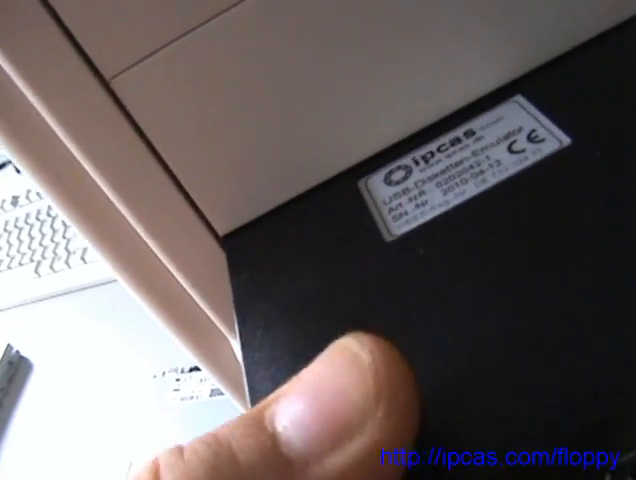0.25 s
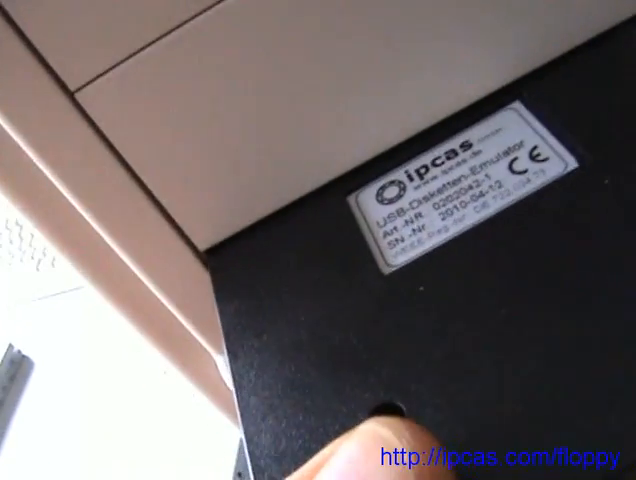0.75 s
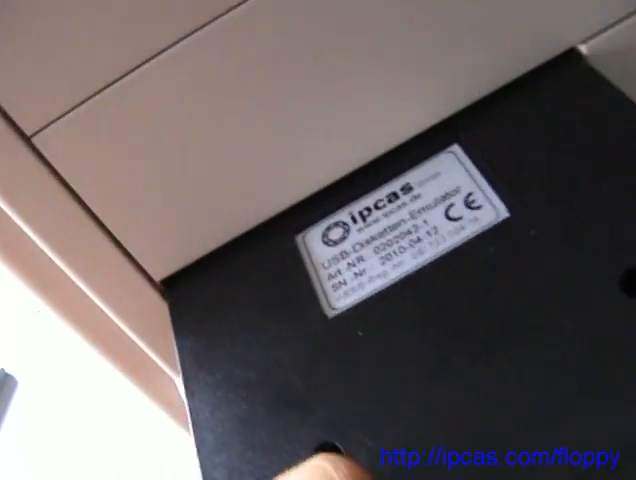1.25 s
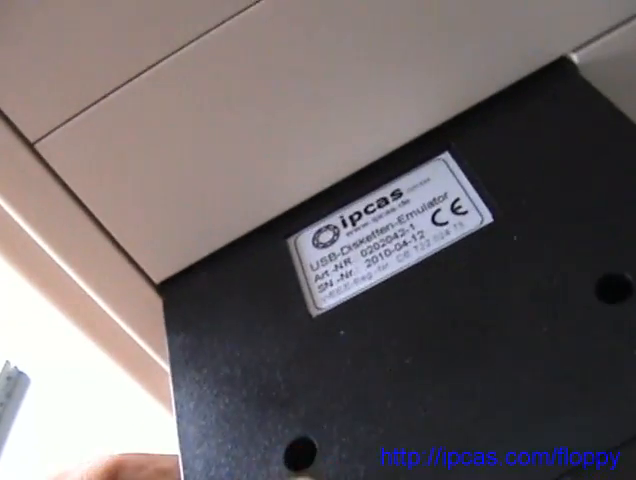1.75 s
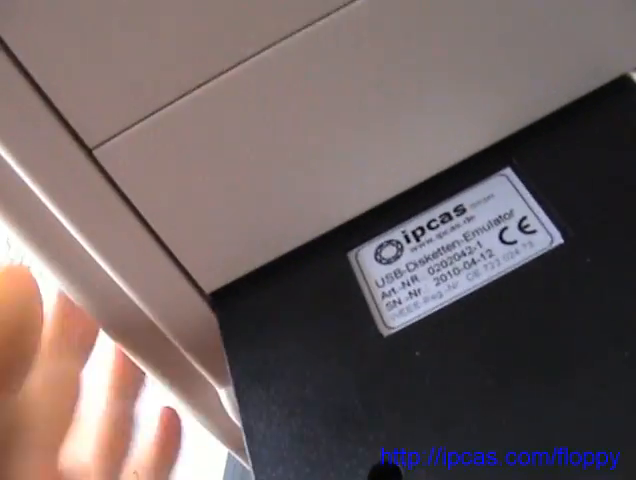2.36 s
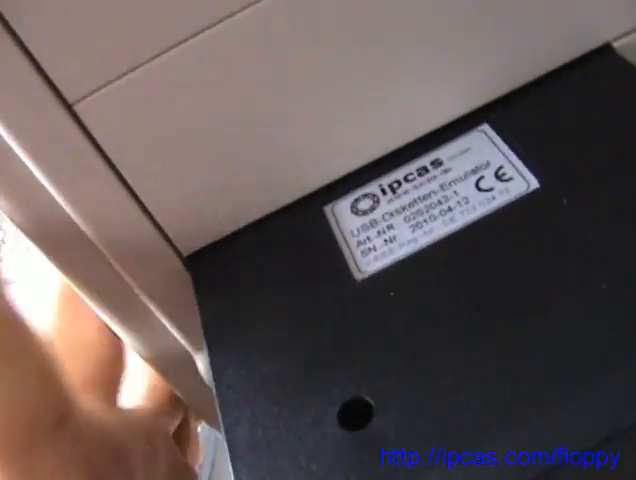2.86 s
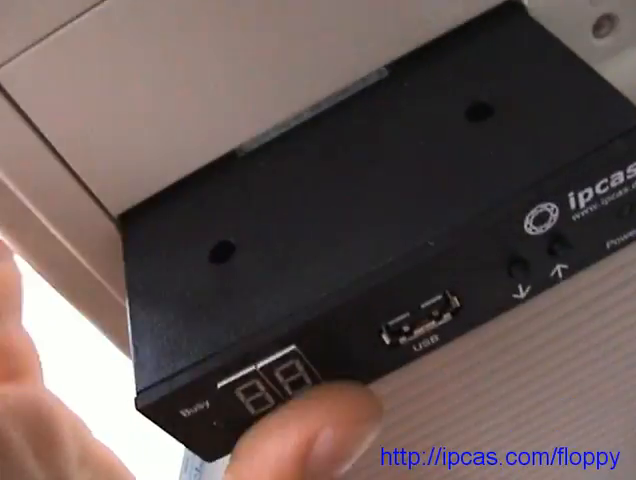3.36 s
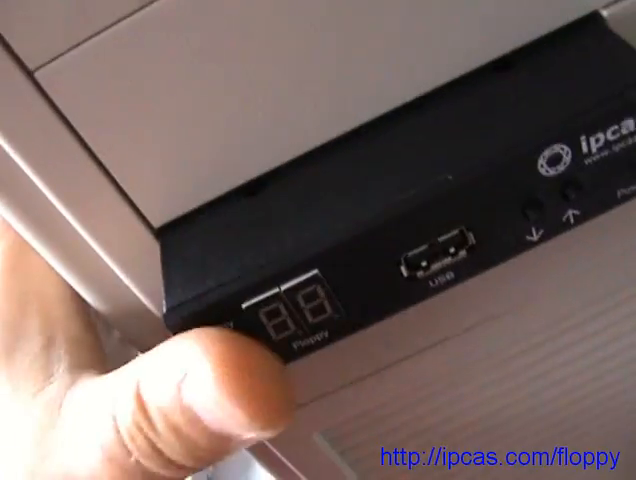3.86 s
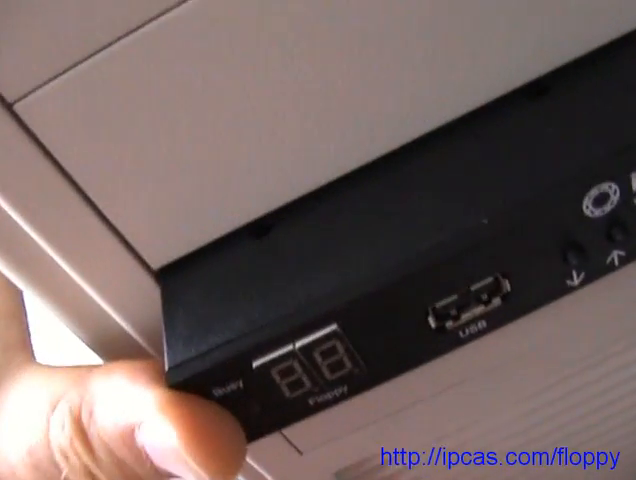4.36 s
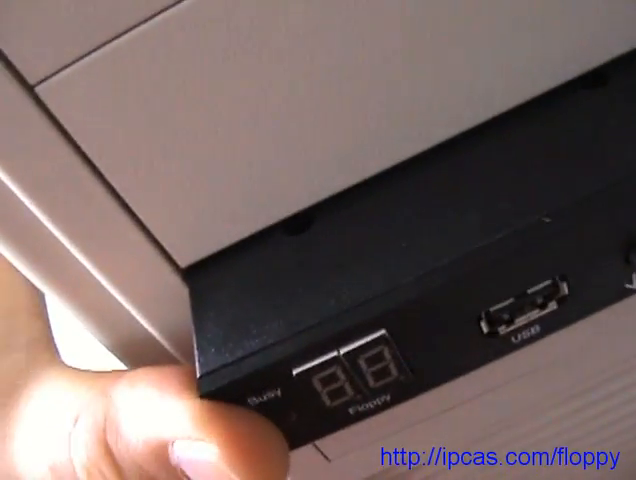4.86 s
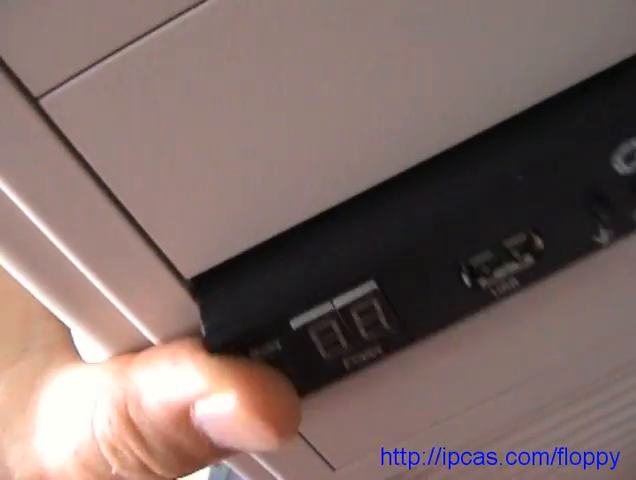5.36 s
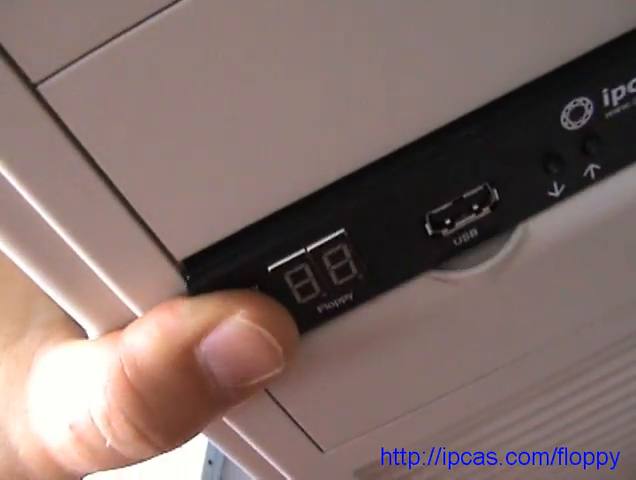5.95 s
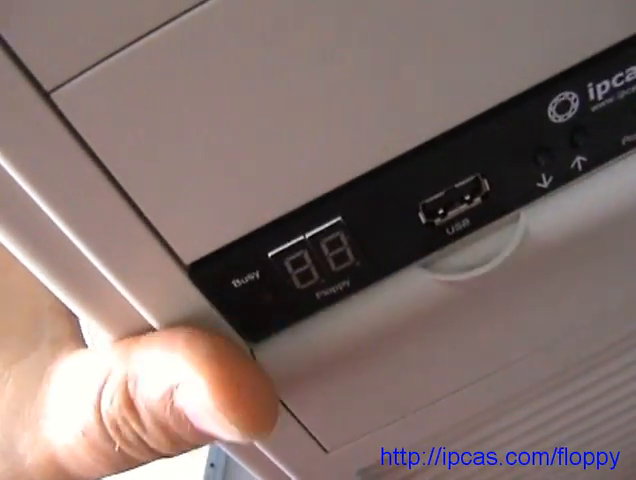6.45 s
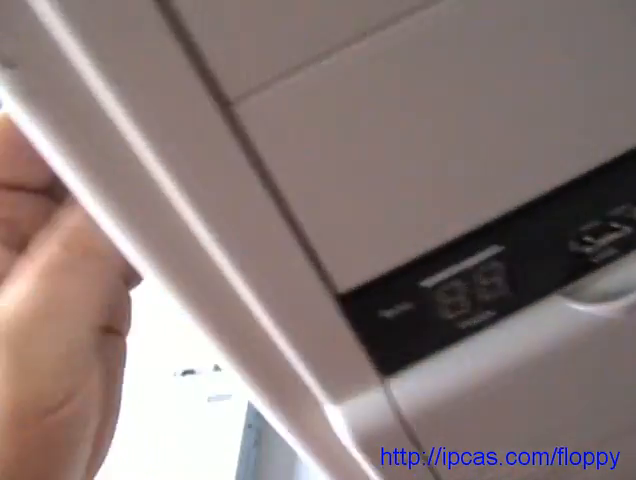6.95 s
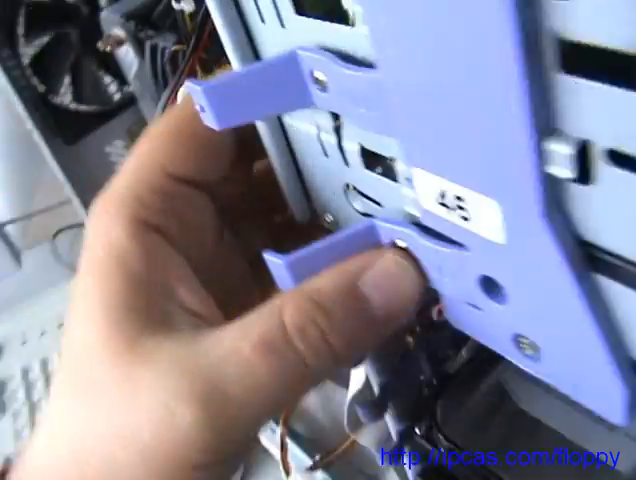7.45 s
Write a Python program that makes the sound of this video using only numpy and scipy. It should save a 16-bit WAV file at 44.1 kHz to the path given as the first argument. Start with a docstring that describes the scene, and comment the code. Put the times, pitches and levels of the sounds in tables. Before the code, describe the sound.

Close plastic knocks, clicks and short scrapes as a small drive is pushed into a metal computer case in a quiet room.

```python
"""In a small, quiet room, a small drive is nudged and pushed into the bay of a computer case,
close to a camera microphone. Its plastic shell knocks, snaps and scrapes as noise bursts and damped modes;
single sine modes squeak and ring on. Resonant bands make the sheet-metal case ring along, and
decaying noise tails form the room. Dull room noise, hiss and a faint whine lie underneath."""
import sys
import numpy as np
from scipy import signal
from scipy.fft import rfft, irfft, next_fast_len
from scipy.io import wavfile
from scipy.ndimage import map_coordinates

SR = 44100
rng = np.random.default_rng(int(sys.argv[2]) if len(sys.argv) > 2 else 0)


def dump(signal):
    """Clip the signal to [-1, 1] and save it as 16-bit WAV at the path in sys.argv[1]."""
    limited = np.clip(np.atleast_2d(signal).T, -1, 1)
    pcm = np.round(limited * 32767).astype(np.int16)
    wavfile.write(sys.argv[1], SR, pcm)


N = 339122  # samples

# In contact tables, levels are before the register trims and decays before the register factors.
# the drive knocks against the rails: (time [s], body level [dB], thud re body [dB], hardness [dB],
# thud pitch [Hz], decay t60 [s])
KNOCKS = [(0.041, -34, -3.5, -18, 335, 0.027), (0.201, -54, -2, 2.5, 338, 0.051),
          (0.244, -29.5, -2, -19, 314, 0.076), (0.484, -42.5, 5.5, -19, 349, 0.042),
          (0.563, -40, -5, -13.5, 212, 0.078), (0.637, -47, 1, -4, 238, 0.14),
          (0.673, -34, -5.5, -16.5, 201, 0.06), (0.786, -35.5, 0, 2, 286, .12),
          (0.919, -42, -2.5, -20, 225, 0.039), (1.101, -27.5, -6, -10, 363, 0.055),
          (1.244, -42.5, 5, -10.5, 302, .063), (1.319, -38, 6, -8.5, 380, .065),
          (1.402, -47.5, 2.5, -1.5, 194, 0.24), (1.44, -50, 2, 0, 188, 0.09),
          (1.676, -23.5, -4.5, -3, 232, 0.057), (1.783, -35.5, 2.5, -6.5, 419, 0.036),
          (1.796, -33.5, -10, -12.5, 470, 0.081), (2.1801, -19.5, -5, -6, 444, 0.06),
          (2.582, -50.5, -10, -4.5, 380, .08), (2.7273, -27.5, 2, -0.5, 256, 0.096),
          (2.922, -48, -12, -13.5, 233, 0.083), (3.091, -47, 5, -12, 238, 0.063),
          (3.152, -52, 16.5, -2.5, 266, 0.16), (3.197, -19.5, -9.5, -14, 370, 0.083),
          (3.243, -22.5, -17, -4, 238, 0.13), (3.27, -28.5, -0.5, -6, 224, 0.12),
          (3.336, -44.5, -2, -1, 392, 0.26), (3.42, -47.5, -2, 2, 350, 0.052),
          (3.549, -56.5, 18, -2, 223, 0.088), (3.594, -41, 3, -8.5, 228, .14),
          (3.638, -26.5, -16, -8, 234, 0.11), (3.823, -22, -1, -7, 216, .035),
          (3.83, -27.5, 3.5, -5, 434, 0.15), (3.929, -38.5, 1, -7.5, 176, 0.13),
          (4.032, -54.5, 12.5, 6, 441, 0.2), (4.265, -27.5, -4, -10, 385, 0.079),
          (4.76, -59, 2, 0.5, 245, .08), (5.206, -22.5, 1.5, -4.5, 208, 0.033),
          (5.214, -28.5, -8, -4, 253, 0.077), (6.021, -38, 1, -4, 220, 0.089),
          (6.068, -48, 4, -1, 340, 0.13), (6.621, -51, 6, 1.5, 250, 0.081),
          (7.523, -47, -11, -15, 275, 0.032)]
# shoves along the rails: (start [s], rise [s], hold [s], release t60 [s], body level [dB],
# thud re body [dB], hardness [dB])
SHOVES = [(0.08, 0.021, 0.027, 0.071, -53.5, -5, -6.5), (0.214, 0.022, .003, 0.046, -51, -2, 1),
          (0.43, 0.025, 0.021, 0.092, -42.5, -3.5, -6), (0.892, 0.0079, 0.014, 0.054, -38.5, -10.5, -8.5),
          (2.968, 0.011, 0.017, 0.39, -56.5, 6, 5.5), (3.164, 0.033, 0.068, 0.086, -26.5, -11.5, -6.5),
          (3.537, 0.096, 0.007, 0.27, -35.5, -5, -5), (3.675, 0.02, .012, 0.11, -42, 2, -11.5),
          (3.764, 0.019, 0.039, 0.046, -52.5, 2, -0.5), (3.851, 0.0085, .03, 0.16, -43, -0.5, -16),
          (5.268, 0.042, 0.024, 0.09, -57.5, -1, 1.5), (5.402, 0.054, 0.056, 0.26, -37, 0.5, -6),
          (6.005, 0.016, .003, 0.044, -49, 6, 2), (6.17, 0.012, 0.0063, 0.21, -56, 6, 3.5),
          (6.234, 0.038, 0.058, .1, -60, 10.5, -1), (6.86, 0.043, 0.035, .08, -58.5, -2, -2.5),
          (7.199, 0.013, .03, 0.17, -66.5, 4, 6.5), (7.35, 0.014, .06, .08, -68, 1, 5.5)]
# squeaks and parts left ringing: (time [s], pitch [Hz], level [dB], rise [s], decay t60 [s])
RINGS = [(0.042, 335, -26.5, 0.0022, 0.059), (0.794, 1075, -3.5, 0.016, 0.035),
         (2.182, 109, -27, 0.0021, 0.065), (2.729, 3203, -23.5, 0.00059, 0.029),
         (2.754, 1480, -28, 0.013, 0.1), (3.65, 639.5, -25.5, 0.024, 0.23), (3.826, 759, -21, 0.0016, 0.12),
         (4.031, 2692, -41, 0.0025, 0.08), (4.031, 3430, -41, 0.0028, 0.058), (6.76, 3220, -55, .08, .3)]
# thin plastic clips snap: (time [s], level before trim [dB])
SNAPS = [(0.04, -41), (0.778, -32), (0.833, -30.5), (0.856, -33.5), (2.15, -52.5), (3.175, -38),
         (4.888, -50.5), (6.938, -51)]
# the drive catches and grinds just before it jumps: (time [s], length [s], level before mix [dB])
CATCHES = [(1.674, 0.0037, -32), (1.78, 0.0035, -47), (5.199, 0.0022, -40), (5.2014, 0.006, -30.5)]
# sheet-metal panels: (pitch [Hz], width [Hz], level before mix [dB])
CASE_PANELS = [(123, 19, -6), (232, 11.8, 1), (290, 15, -32), (470, 18, -8), (653, 7.1, -1.5),
               (744.4, 55, -5), (937, 6.2, -5), (1073, 11, -2), (1185, 22, -7), (1444, 53, -2.5),
               (1558, 9.7, 2), (1660, 51, -10), (2038, 68, -3), (2210, 38, -26), (2490, 29, -38),
               (3060, 44, -9), (4150, 430, -9.5), (4580, 100, -6), (5300, 60, -17), (6350, 34, 3)]
# body, thud, edge and tick, in that order: (low edge [Hz], high edge [Hz])
REGISTERS = [(644, 1133), (163.5, 420), (1290, 3080), (3750, 9000)]
# release of body, thud, edge, tick re the shove's [ratio]: a slowing slide turns to rumble
LINGER = (0.87, 1.65, 0.59, 0.78)
# sign of body, thud, edge, tick in a scrape: keeps overlapping neighbouring bands from cancelling
POLARITY = (1, -1, -1, 1)
# decay of the room: (frequency [Hz], t60 [s])
ROOM_DECAY = [(150, 0.59), (400, 0.61), (1000, 0.21), (3000, 0.36), (10000, 0.32)]
# colour of the room: (frequency [Hz], relative level [dB])
ROOM_COLOUR = [(80, -6), (230, -4.5), (700, -7), (1500, -5.5), (4000, -10.5), (10000, -13.5)]
# spectrum shared by room noise and hiss: (frequency [Hz], relative density [dB per Hz])
AIR = [(15, -32), (25, -4.5), (194, 0), (276, -2.5), (338, 3.5), (374, -3.5), (457, -1), (635, -4.5),
       (952, -5), (1110, -9.5), (1750, -13), (2490, -20), (3120, -20), (3450, -22.5), (10500, -25.5),
       (13600, -152), (22000, -120)]
# background over time: (time [s], room noise before trim [dB], hiss before trim [dB])
FLOOR = [(0, -60, -61.5), (1.6, -57.5, -63), (1.999, -58.5, -65), (2.4, -60.5, -60), (3.5, -59.5, -64.5),
         (4.1, -59.5, -61.5), (4.6, -62, -65.5), (6.5, -62, -66.5), (7.69, -60, -60)]
# faint steady bands: (centre [Hz], width [Hz], level [dB])
WHINE = [(942, 25, -79), (3165, 120, -78), (5680, 150, -77.5), (6428, 120, -84)]

TOP_HZ = 11200  # upper limit of the microphone's band


def amp(db):
    """Decibels to a linear gain."""
    return 10 ** (np.asarray(db) / 20)


def unit(x):
    """x at rms 1."""
    return x / np.sqrt(np.mean(x ** 2) + 1e-20)


def blow(x):
    """x with the energy of 10 ms at rms 1."""
    return x / np.sqrt(np.sum(x ** 2) / (SR * 0.01) + 1e-20)


def along(points, hz):
    """Interpolate (frequency [Hz], value) points on a log frequency axis."""
    f, v = np.transpose(points)
    return np.interp(np.log(hz + 1), np.log(f + 1), v)


def filtered(x, response):
    """x through a complex response of frequency, with padding for its tail."""
    m = next_fast_len(len(x) + SR // 2)
    return irfft(rfft(x, m) * response(np.fft.rfftfreq(m, 1 / SR)), m)[:len(x)]


def band(x, edges_hz, order=2):
    """Causal band-pass."""
    return signal.sosfilt(signal.butter(order, edges_hz, "band", fs=SR, output="sos"), x)


def resonance(f, hz, width):
    """Causal response of one mode, at gain 1 on its pitch."""
    return 1j * f * width / (hz * hz - f * f + 1j * f * width)


def add(track, s, sound):
    """Mix a sound in at time s."""
    start = max(round(s * SR), 0)
    track[start:start + len(sound)] += sound[:N - start]


def ring(t, hz, rise, t60):
    """One damped mode with a soft start."""
    return np.sin(2 * np.pi * hz * t) * amp(-60 * t / t60) * (1 - np.exp(-t / rise))


def background(low_db=0, hiss_db=1, split_hz=2000):
    """Dull room noise, microphone hiss and a faint whine: shaped noises, the first two drifting in level."""
    s, room_level, hiss_level = np.transpose(FLOOR)
    t = np.arange(N) / SR

    def noise(response):
        return unit(filtered(rng.standard_normal(N), response))

    low = noise(lambda f: amp(along(AIR, f)) / np.hypot(1, (f / split_hz) ** 2))
    hiss = noise(lambda f: amp(along(AIR, f)) / np.hypot(1, (split_hz / (f + 1)) ** 2) * (f < TOP_HZ))
    whine = sum(amp(db) * noise(lambda f: resonance(f, hz, width)) for hz, width, db in WHINE)
    low_gain = amp(np.interp(t, s, room_level) + low_db)
    hiss_gain = amp(np.interp(t, s, hiss_level) + hiss_db)
    return low * low_gain + hiss * hiss_gain + whine


def contact(levels_db, knock_hz, thud_hz, t60, life=(0.85, 1.1, 0.75, 0.6), body_mode=0.77, thud_mode=0.91,
            rise=0.0014, slide=0.022, edge_mode=0.3, edge_hz=1480):
    """A scuff, and the dense cluster of plastic modes that follows; one stands out in body, thud and edge."""
    t, gains = np.arange(SR // 4) / SR, amp(levels_db)

    def burst(edges, decay):
        return blow(band(rng.standard_normal(len(t)) * amp(-60 * t / decay), edges))

    parts = [burst(edges, t60 * k) for edges, k in zip(REGISTERS, life)]  # the highest modes die first
    edge_pitch = edge_hz * 2 ** (0.114 * rng.standard_normal())
    modes = [(knock_hz, body_mode), (thud_hz, thud_mode), (edge_pitch, edge_mode)]
    for i, (hz, share) in enumerate(modes):
        parts[i] = blow(parts[i] + share * blow(ring(t, hz, rise, t60 * life[i])))
    # the surfaces slide ever faster just before they meet: a decaying burst turned backwards
    scuff = gains @ np.array([burst(edges, slide) for edges in REGISTERS])
    return scuff[:SR // 30][::-1], gains @ np.array(parts)


def snaps(trim_db=-2.0, rise=0.00049):
    """A clip lets go without a scuff: mostly treble, with one balance and one ringing pitch throughout."""
    balance_db = np.array((-8, -18, -5, 0))  # body, thud, edge, tick
    body_hz, thud_hz, t60 = 1233, 240, 0.054
    clip_hz, clip_db, clip_t60 = 5320, -10, 0.047
    out, t = np.zeros(N), np.arange(SR // 4) / SR
    for s, db in SNAPS:
        _, snap = contact(db + trim_db + balance_db, body_hz, thud_hz, t60)
        add(out, s, snap)
        add(out, s, amp(db + trim_db + clip_db) * blow(ring(t, clip_hz, rise, clip_t60)))
    return out


def knocks(register_db=(-2, -3, -2, -2), scuff_db=-20):
    """Each contact scuffs, then rings the shell; its hardness sets both brightness and body pitch."""
    base_hz, octaves_per_db = 888, 0.02  # a harder contact rings higher
    tick_db, tick_grows = -5.5, 1.27  # the tick follows hardness a little faster than the edge
    out = np.zeros(N)
    for s, db, thud_db, hard_db, thud_hz, t60 in KNOCKS:
        balance_db = np.array([0, thud_db, hard_db, tick_db + tick_grows * hard_db])
        knock_hz = base_hz * 2 ** (octaves_per_db * hard_db)
        scuff, knock = contact(db + balance_db + register_db, knock_hz, thud_hz, t60)
        add(out, s - len(scuff) / SR, amp(scuff_db) * scuff)
        add(out, s, knock)
    return out


def rings():
    """Single damped pitches: a rail squeaks, a panel or a clip keeps ringing."""
    out, t = np.zeros(N), np.arange(SR // 2) / SR
    for s, hz, db, rise, t60 in RINGS:
        add(out, s, amp(db) * ring(t, hz, rise, t60))
    return out


def scrapes(register_db=(-2, -2, -2, -7), slips_per_s=1300, scatter_db=3):
    """Plastic sticks and slips: a hail of uneven blows over a smooth rub; each shove rises, holds and dies."""
    rise_power = 1.7  # the rub grows with the speed of the slide
    tick_grows = 0.95  # tick level per dB of hardness
    chatter_db, chatter_per_s = 1.5, 140.7  # the grip of a sliding rail comes and goes
    out, t = np.zeros(N), np.arange(SR * 3 // 5) / SR
    for s, rise, hold, release, db, thud_db, hard_db in SHOVES:
        slips = (rng.random(len(t)) < slips_per_s / SR) * rng.choice([-1, 1], len(t))
        slips = slips * amp(scatter_db * rng.standard_normal(len(t)))
        grip_db = chatter_db * map_coordinates(rng.standard_normal(len(t)), [t * chatter_per_s])
        force = (unit(slips) + 0.5 * rng.standard_normal(len(t))) * amp(grip_db)
        speeding_up = np.minimum(t / rise, 1) ** rise_power
        slowing_s = np.maximum(t - rise - hold, 0)
        levels_db = db + np.array([0, thud_db, hard_db, tick_grows * hard_db]) + register_db
        for edges, level_db, linger, sign in zip(REGISTERS, levels_db, LINGER, POLARITY):
            gain = speeding_up * amp(level_db - 60 * slowing_s / (release * linger))
            add(out, s, sign * unit(band(force, edges)) * gain)
    return out


def catches(edges_hz=(700, 3500)):
    """A few milliseconds of harsh band-passed noise as an edge grinds over a catch."""
    out = np.zeros(N)
    for s, length, db in CATCHES:
        grind = band(rng.standard_normal(round(length * SR)), edges_hz, order=1)
        add(out, s, amp(db) * unit(grind))
    return out


def case(x):
    """The panels ring along with whatever touches the bay: a sum of resonances."""
    return filtered(x, lambda f: sum(amp(db) * resonance(f, hz, width) for hz, width, db in CASE_PANELS))


def room(x, gap=0.0032, count=24):
    """A diffuse noise tail with its own decay per frequency, drawn afresh for each short stretch."""
    out = np.zeros(N)
    step = N // count + 1
    for start in range(0, N, step):
        hz, t, z = signal.stft(rng.standard_normal(SR * 3 // 5), SR, nperseg=256)
        fall_db = along(ROOM_COLOUR, hz)[:, None] - 60 * t / along(ROOM_DECAY, hz)[:, None]
        onset = 1 - np.exp(-t / gap)
        tail = signal.istft(z * amp(fall_db) * onset, SR, nperseg=256)[1]
        add(out, start / SR, signal.fftconvolve(x[start:start + step], tail / np.linalg.norm(tail)))
    return out


def scene(direct_db=-1, case_db=1, room_db=-15):
    """Contacts heard directly, through the case and from the room, over the background."""
    contacts = knocks() + snaps() + catches() + scrapes()
    near = amp(direct_db) * contacts + amp(case_db) * case(contacts) + rings()
    return (near + amp(room_db) * room(near) + background())[None]


def record(dry):
    """The camera microphone cuts off steeply above its band limit."""
    return filtered(dry[0], lambda f: 1 / np.hypot(1, (f / TOP_HZ) ** 40))[None]


dry = scene()
out = record(dry)
dump(out)
```